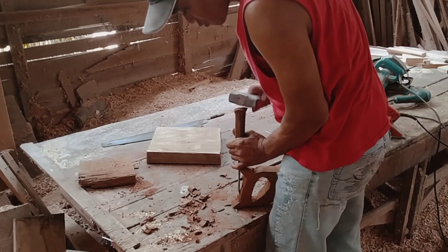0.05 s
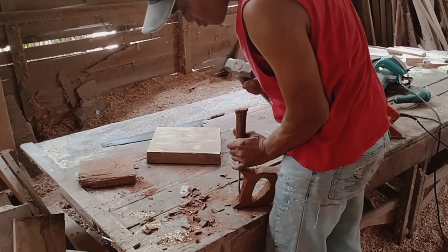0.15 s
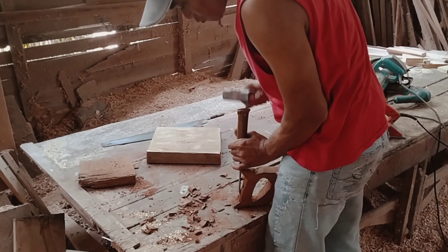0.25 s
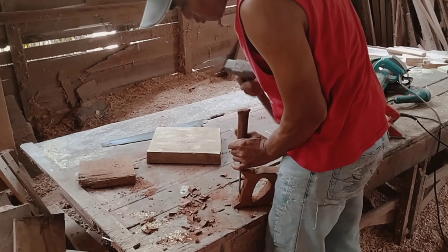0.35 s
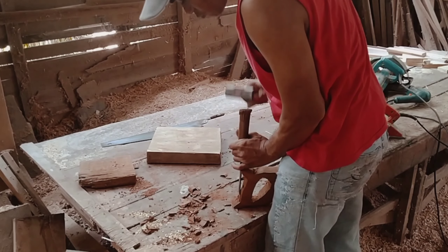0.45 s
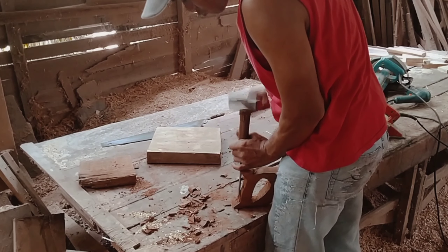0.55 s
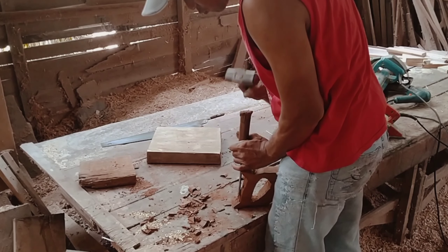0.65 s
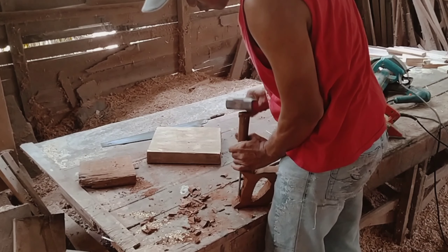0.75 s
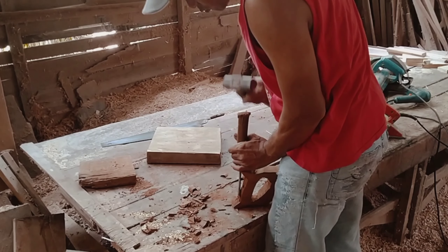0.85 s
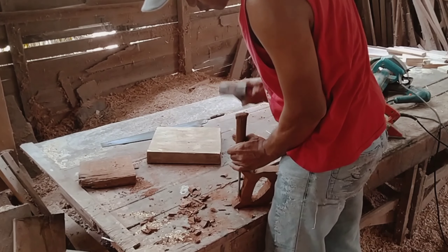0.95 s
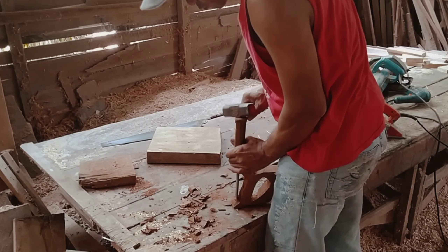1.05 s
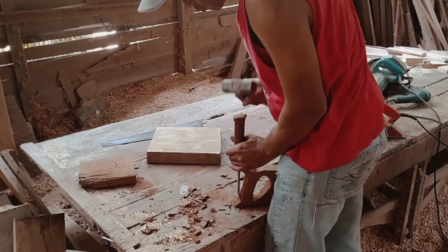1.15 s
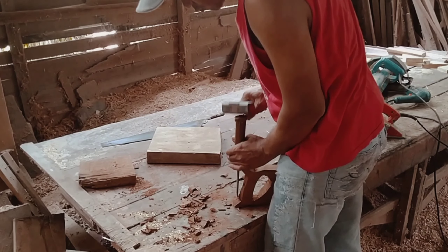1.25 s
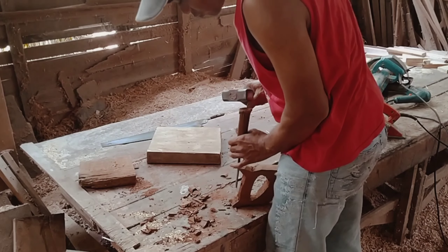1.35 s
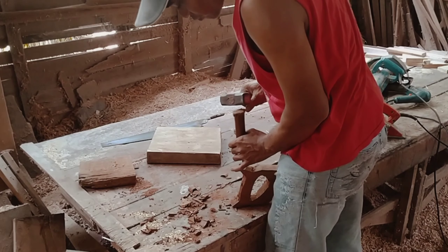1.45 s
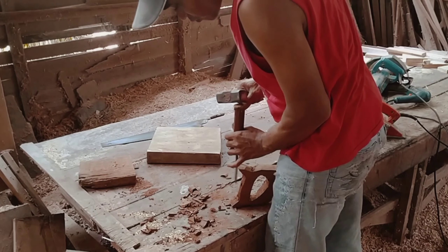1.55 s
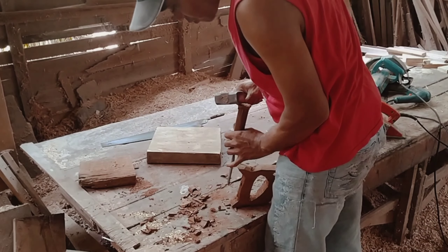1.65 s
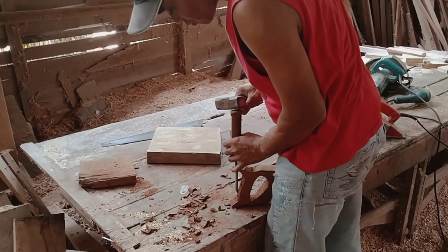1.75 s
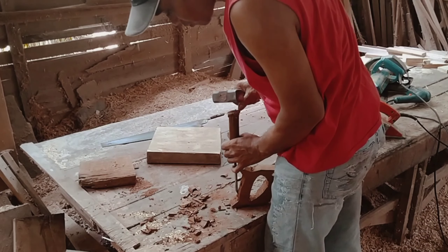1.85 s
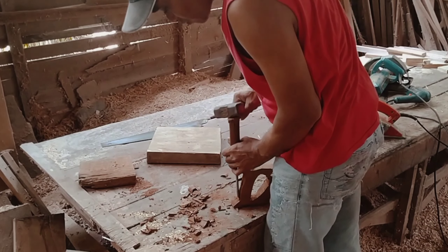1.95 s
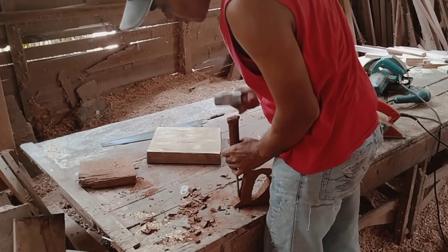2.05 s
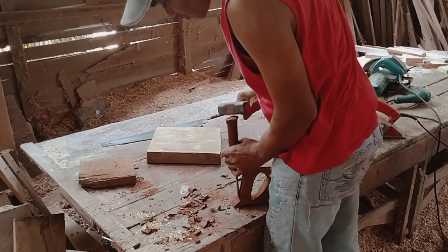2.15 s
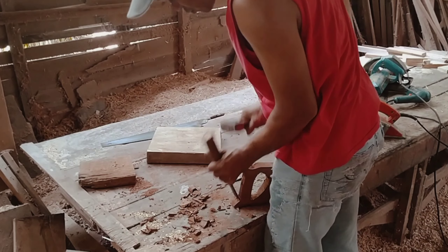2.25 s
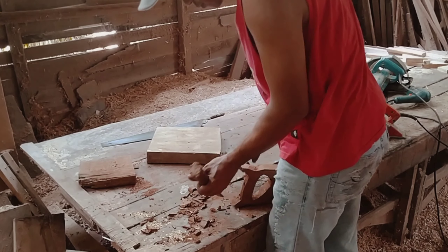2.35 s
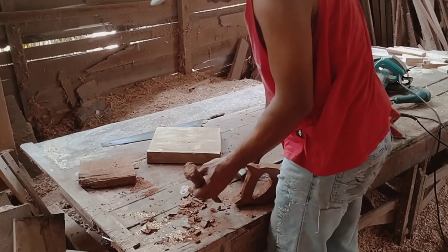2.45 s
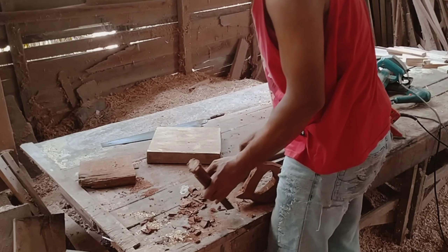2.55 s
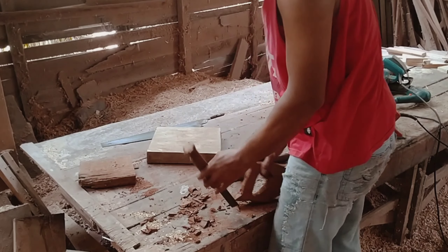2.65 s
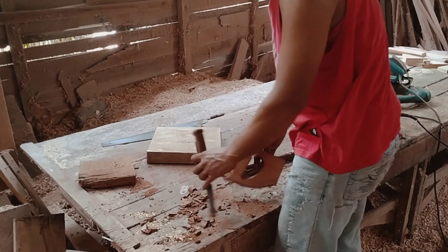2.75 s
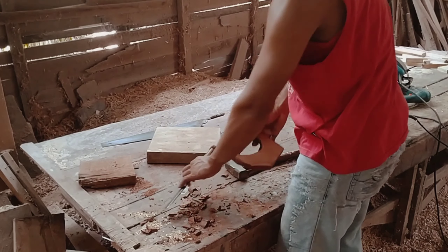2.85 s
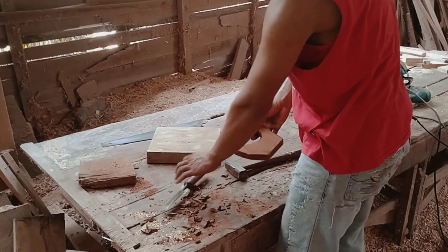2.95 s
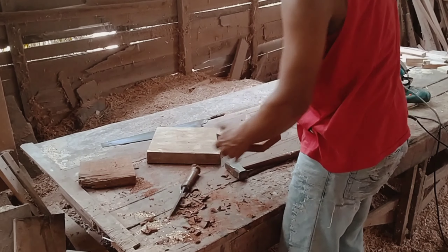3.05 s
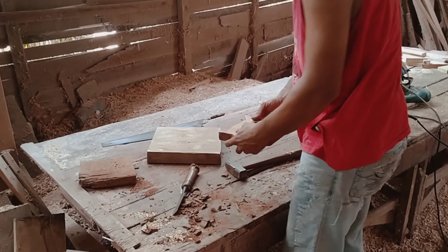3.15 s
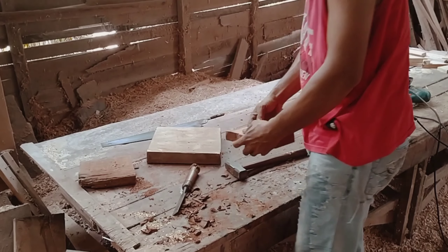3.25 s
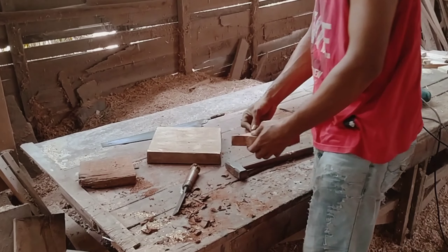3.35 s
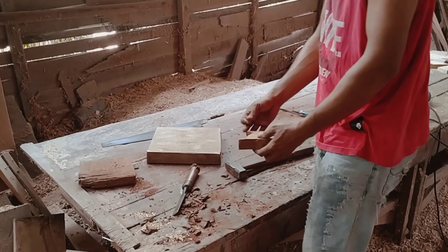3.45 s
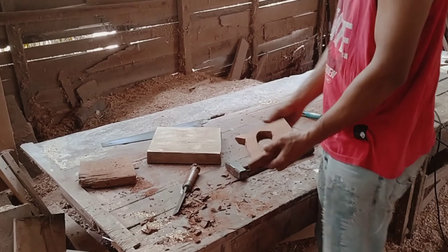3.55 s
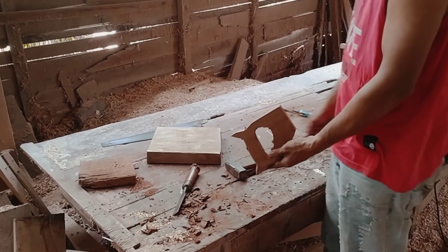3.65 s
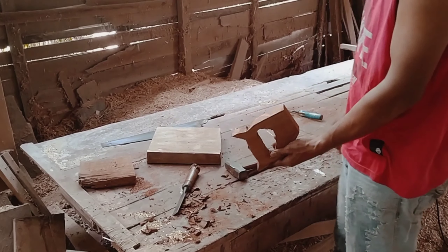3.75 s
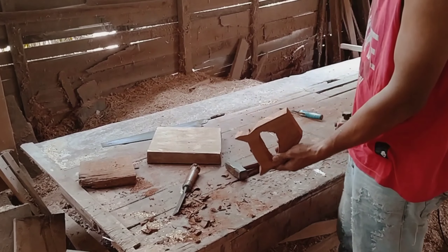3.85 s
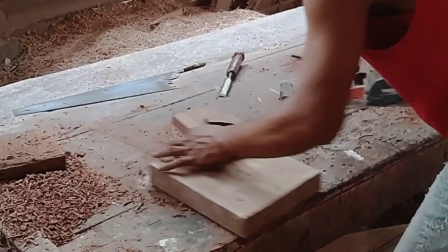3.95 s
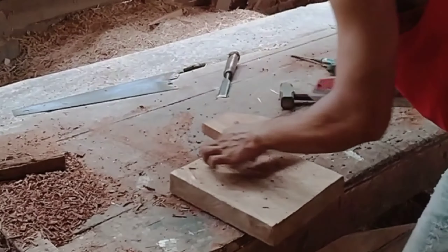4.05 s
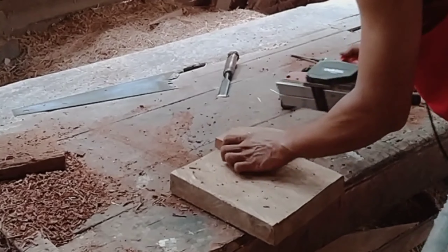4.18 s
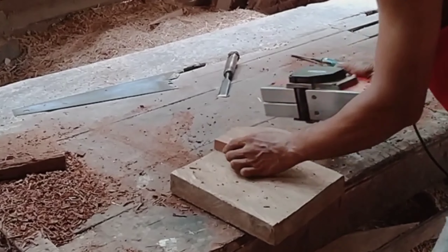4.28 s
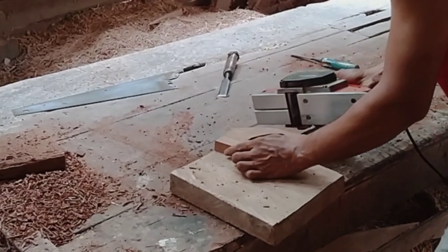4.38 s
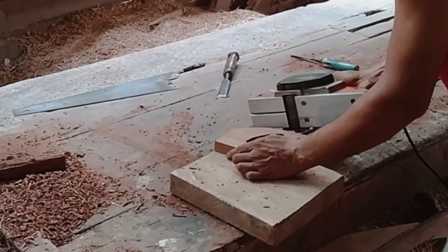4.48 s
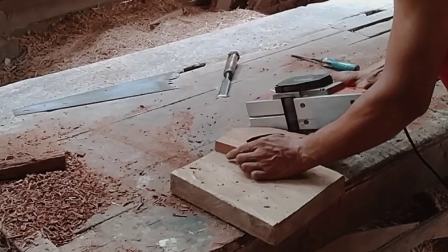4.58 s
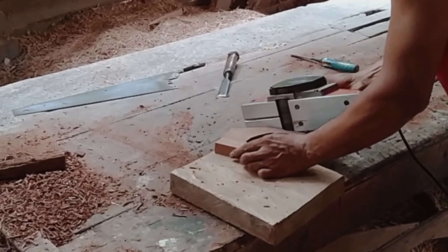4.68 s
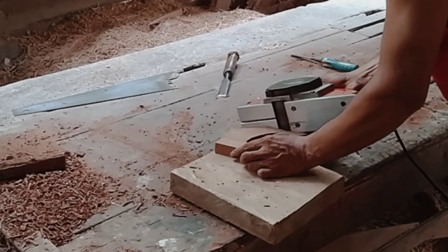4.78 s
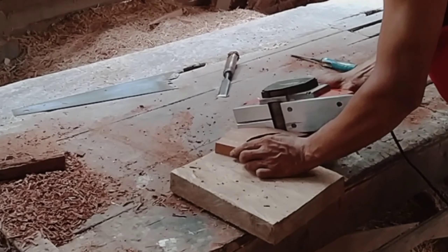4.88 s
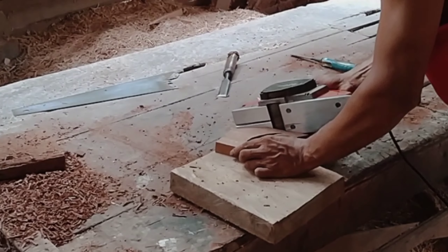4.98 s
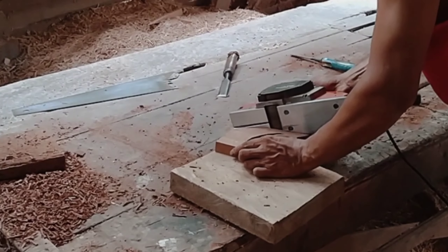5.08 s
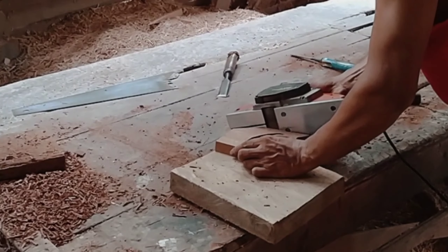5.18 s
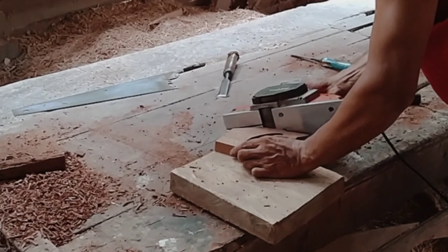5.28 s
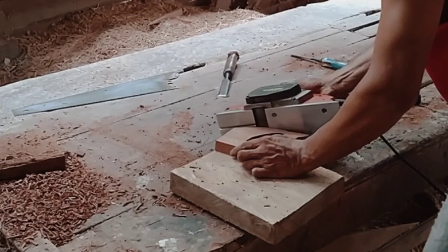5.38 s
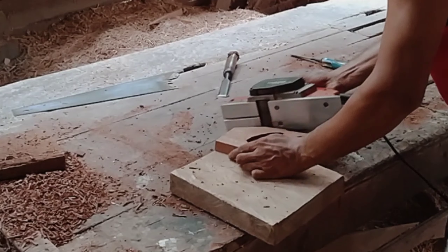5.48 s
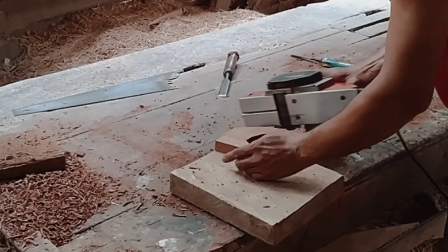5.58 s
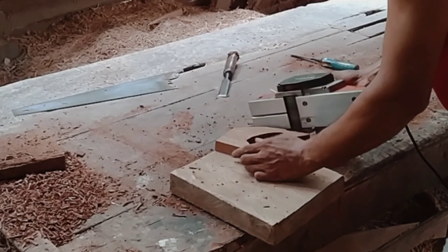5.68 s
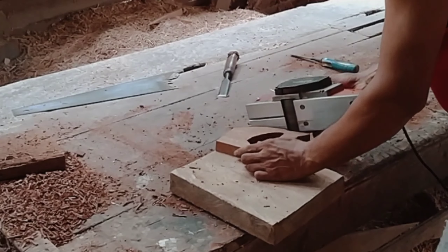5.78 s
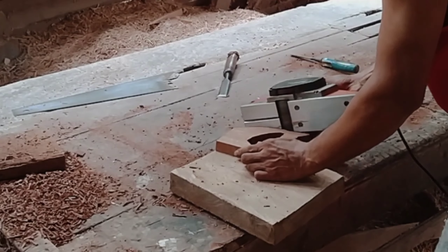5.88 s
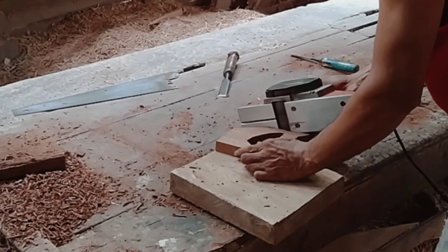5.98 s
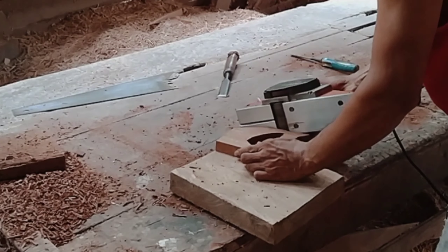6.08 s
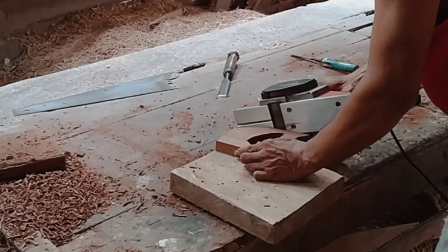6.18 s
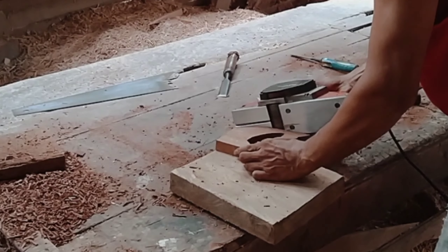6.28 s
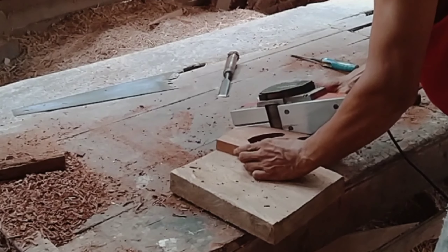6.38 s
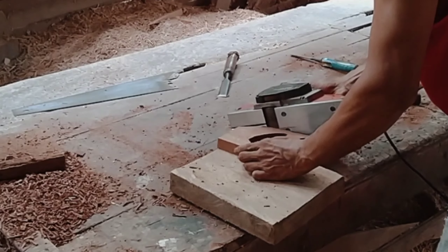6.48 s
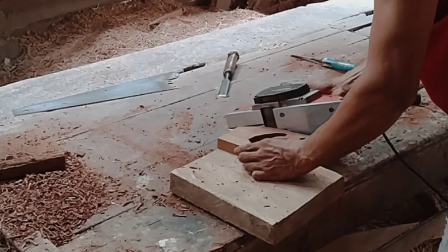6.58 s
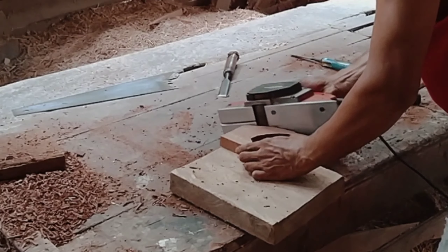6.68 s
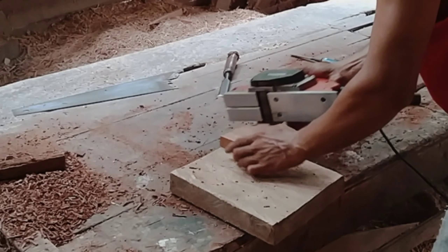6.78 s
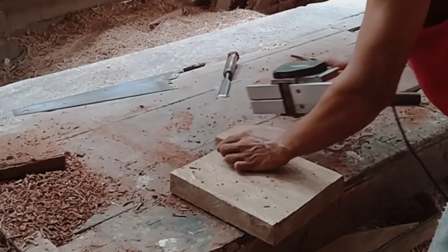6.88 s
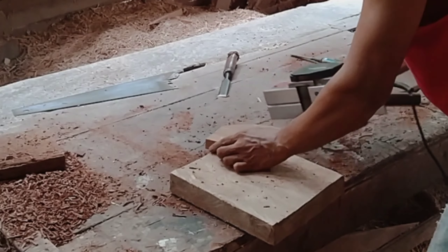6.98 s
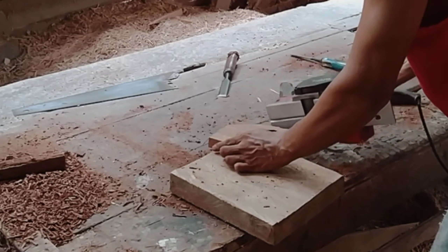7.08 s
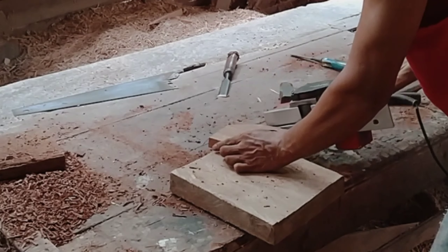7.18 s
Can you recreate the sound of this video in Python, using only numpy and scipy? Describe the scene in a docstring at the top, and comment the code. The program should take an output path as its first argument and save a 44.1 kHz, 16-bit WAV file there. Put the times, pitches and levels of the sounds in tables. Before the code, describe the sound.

Woodworking at a plank bench, one nearby microphone, short shed reflections. Quick hammer-on-chisel cracks with hollow bench resonance come first, a pause, one last strong blow, then scrapes, wooden bumps and two metallic clacks. Faint rustling shavings follow. A hand planer is blipped with a sharp brush squeal, then runs through two tearing passes, its whine sagging under load, turning ragged, and winding down slowly.

```python
"""Chisel and planer in a shed

Plank bench in a wooden shed, one microphone close by, mono; low rumble and a thin insect drone outside.
A hammer drives a chisel: each blow is a crack, a bench ring of decaying modes and noise, and hopping chips.
Tools and wood are put down: shorter cracks, wood or steel rings, gliding scrapes and noise rustles.
An electric hand planer is blipped, makes two cuts that end in chatter and coasts after each: whine, fan
and load lines follow a computed motor speed, with clacks, and noise for rumble, tearing fibres and air."""
import sys
import numpy as np
from scipy import signal
from scipy.fft import rfft, irfft
from scipy.io import wavfile
from scipy.ndimage import uniform_filter1d

SR = 44100
rng = np.random.default_rng(int(sys.argv[2]) if len(sys.argv) > 2 else 0)


def store_wav(level_fs):
    """Save 16-bit WAV to argv[1]."""
    pcm = np.round(np.clip(np.atleast_2d(level_fs), -1, 1) * 32767)
    wavfile.write(sys.argv[1], SR, pcm.T.astype(np.int16))


N = 318703
T = np.arange(N) / SR

# Spectra hold [f/Hz, relative level/dB]. Event levels are relative within each kind unless noted.
# background outdoors: spectrum; mean level/dB
FLOOR_COLOUR = [(25, -12.5), (42, -0.5), (62, -6.5), (105, -3.5), (140, -14), (250, -18.5), (550, -26.5),
                (800, -24.5), (1600, -32), (2300, -35.5), (5500, -52.5), (8300, -48.5), (11000, -54),
                (15000, -51)]
FLOOR_DB = -37.7
# low rumbles at the opening, and under the planer as it starts, cuts and is lifted: [t/s, length/s, level/dB]
LOW_RUMBLES = [(0, .3, -29), (4.08, .58, -28.5), (4.6, .45, -31), (6.25, .42, -27), (6.98, .3, -29)]

# dense reverberant tail of shed and bench: [f/Hz, t60/s]
SHED_DECAY = [(100, 0.23), (260, 0.24), (700, 0.27), (1840, 0.31), (5000, 0.33), (12000, 0.13)]
# clear modes of the bench, then of steel tools: [f/Hz, relative level/dB, t60/s]
BENCH_MODES = [(122.4, -1.5, 0.47), (205, -3, 0.19), (382, -3, .1), (517, 1.5, .09), (672, 3.5, 0.078),
               (756, 3.5, 0.086), (829, -14, 0.099), (918, -1, 0.15), (1000, -3.5, 0.24), (1230, -12, 0.35),
               (1470, -12, 0.19), (1670, -18, 0.063), (1840, -16, 0.35)]
STEEL_MODES = [(1190, -10, 0.33), (1319, -9.5, 0.22), (1410, -9, .3), (1480, 5, 0.24), (1810, 4, .12),
               (3370, -6, 0.16), (3410, -6, 0.19)]
# dense ring of bench and shed, and of the steel: spectra
BENCH_RING_COLOUR = [(41, -45), (70, -6), (107, -2.5), (195, -1), (418, -9.5), (849, -4.5), (985, -12),
                     (1080, -10), (2110, -16.5), (2320, -22), (4800, -33.5), (5170, -33), (6000, -35.5),
                     (7800, -41), (13200, -120)]
STEEL_RING_COLOUR = [(180, -44), (300, -8), (501, -8), (1010, -1), (1360, 3), (1800, -19), (2260, -11.5),
                     (3100, -21), (3420, -16), (4110, -37), (9000, -56), (11700, -90), (19800, -120)]

# wood and tools bumping the bench: [t/s, knock level/dB, brightness/dB per octave, bench ring level/dB]
KNOCKS = [(2.018, -20.5, 5, -19.5), (2.037, -20, -4, -15.5), (2.525, -12, -2.5, -13),
          (2.556, -17, -4.5, -14), (2.572, -11.5, 0, -14), (2.627, -15, 0, -16), (2.988, -19.5, 1.5, -22),
          (3.046, -20.5, -2.5, -18), (3.125, -17.5, 2.5, -18), (3.165, -33, 2, -37),
          (4.199, -23.5, 2.5, -17)]
# steel tools set down: [t/s, clack level/dB, brightness/dB per octave, ring level/dB]
CLACKS = [(2.6487, -8, 1.5, -14), (2.7250, -10.5, -0.5, -13.5), (3.044, -27, 16, -43)]
# light scrapes and squeaks of wood: [t/s, length/s, start f/Hz, end f/Hz, relative pitch wander, level/dB]
SCRAPES = [(0, 0.1, 4000, 3200, 604, -52), (2.33, 0.041, 597, 595, 30, -32.5),
           (2.344, 0.15, 2600, 3260, 400, -47.5), (2.449, 0.099, 1650, 2160, 298, -37.5),
           (2.487, 0.047, 820, 806, 300, -39), (4.105, 0.12, 3170, 3100, 800, -50)]
# faint rustles of shavings under the hands: [t/s, length/s, level/dB]
RUSTLES = [(3.408, 0.063, -54), (3.655, .03, -52), (3.878, 0.062, -57), (4.08, 0.07, -51),
           (4.21, 0.13, -49), (4.33, .02, -48), (4.43, 0.17, -45.5)]
# contact of wood on bench, and of steel: spectra
KNOCK_COLOUR = [(47, -24), (80, -6), (224, 0.5), (669, -4.5), (2440, -18.5), (3310, -34), (4310, -34.5),
                (5850, -50), (6970, -43.5), (9270, -51), (15000, -49)]
CLACK_COLOUR = [(88, -53), (150, -6.5), (850, -9), (1430, 4.5), (1980, -4), (2310, 1.5), (2810, -5),
                (3210, -27), (3820, -20.5), (5200, -37), (15000, -51)]

# hammer on chisel: [t/s, blow level/dB, brightness/dB per octave, bench ring level/dB, chips level/dB]
BLOWS = [(0.1286, 1, -1.5, 3, -30), (0.3218, -1.5, -0.5, -1.5, -32.5), (0.4984, -2, 0, -1, -34.5),
         (0.6639, -2.5, 2, -5, -36.5), (0.8309, -6, 2.5, -5, -39.5), (.9860, -1.5, 2, -3, -43.5),
         (1.1382, -3.5, 2, -3.5, -46), (1.3100, -9.5, 2, -15, -71), (2.1870, 2, -0.5, -0.5, -51)]
# hammer contact: spectrum
BLOW_COLOUR = [(47, -54), (80, -3.5), (325, -7), (684, 2.5), (1540, -10), (1720, -10.5), (2380, -7.5),
               (3030, -21.5), (4400, -28), (5720, -35.5), (6530, -29.5), (7280, -36.5), (8300, -29),
               (10300, -45.5), (15000, -37)]

# clacks of planer casing and trigger, and of the knives chattering and leaving the wood:
# [t/s, clack level/dB, brightness/dB per octave]
PLANER_CLACKS = [(4.221, -27, -3), (4.229, -13, -3), (4.238, -35, -2), (4.515, -26, 4.5), (4.532, -16, 3),
                 (4.560, -16, 8.5), (4.738, -17, 10), (5.422, -23, 5.5), (6.575, -14, 0.5), (6.612, -12, 1),
                 (6.655, -19, 4), (6.712, -20, 10)]
# contact of these clacks: spectrum
PLANER_CLACK_COLOUR = [(200, -12), (500, -7), (800, -2.5), (1200, 1), (1800, 9), (2600, -9.5), (4000, -19),
                       (6000, -27), (15000, -47)]

# brush squeal at switch-on: attack, hold, then it sags in pitch and dies
SWITCH_ON_S, SQUEAL_ATTACK_S, SQUEAL_HOLD_S, SQUEAL_SAG_S, SQUEAL_T60_S = 4.522, .004, .014, .014, .115
SQUEAL_HZ, SQUEAL_END_HZ, SQUEAL_DB = 6550, 5920, -7.5

# planer trigger: [pressed t/s, released t/s]
TRIGGER = [(4.491, 4.571), (4.728, 5.538), (6.002, 6.878)]
# the motor pulls hardest from rest, down to nothing at ZERO_PULL_HZ; friction coasts it down (1/e time)
PULL_HZ_PER_S, ZERO_PULL_HZ, PULL_FADE, COAST_S = 2766, 483.7, 1.119, 2.383
# passes over the wood: [enters t/s, full drag t/s, bites hardest t/s, leaves t/s, full drag/Hz per s,
# drag on leaving/Hz per s, level/dB, uneven knives level/dB, extra whine/dB (air takes half)]
CUTS = [(4.754, 5.107, 5.02, 5.42, 477, 541, -1, 1, 2.5), (5.919, 6.231, 6.39, 6.71, 348, 270, .4, -10, -4)]
# after its hardest bite a cut turns ragged; the knives come free quickly and the whine recovers
RAGGED_S, EXIT_S, RECOVER_S = .3, .02, .1
LAST_BITE = .95  # share of the bite left at the end of a pass
CHATTER_RATIO, CHATTER_DECAY, CHATTER_SHARE = 1 / 3, .3, .7  # bounces per motor turn, bounce periods, depth 0-1
DRUM_RATIO = .5  # knife drum turns per motor turn

# knife buzz, commutator rasp, tearing fibres: relative level/dB, change in a ragged cut/dB
BUZZ_DB, BUZZ_RAGGED_DB = -15.2, -7
RASP_DB, RASP_RAGGED_DB = -21.7, -3
TEAR_DB, TEAR_RAGGED_DB = -16.4, 2.6
# whine at 400 turns/s and cooling air: relative level/dB, change at hardest bite/dB, change when ragged/dB
WHINE_DB, WHINE_BITE_DB, WHINE_RAGGED_DB = -17, 6.5, -13
AIR_DB, AIR_BITE_DB, AIR_RAGGED_DB = -22.7, 6, -7.5
FAN_DB = -13  # blade tone, heard while the motor pulls
# weaker partials of the whine: [multiple of motor speed, level against the whine/dB]
OVERTONES = [(1, -15), (2, -11.5), (6, -16), (7, -22), (8, -30), (9, -27), (10, -27), (11, -25), (12, -36)]
# housing resonances that the three loud partials glide through: spectrum
HOUSING_COLOUR = [(800, -9), (950, -4.5), (1050, -6), (1170, -1), (1250, 0), (1320, -4.5), (1500, -5),
                  (1620, -3), (1760, -3.5), (1930, -8), (2080, -16)]
# fan duct, cooling air, knife buzz, commutator rasp, tearing fibres: spectra
FAN_COLOUR = [(800, -35), (1350, 1), (1950, -3), (2550, -11), (3150, -4), (3650, -15), (4000, -30)]
AIR_COLOUR = [(60, -14), (140, 0), (220, -1.5), (500, -7), (900, -3.5), (1300, 0.5), (2000, -1.5),
              (2900, -4.5), (4200, -6.5), (5500, -16), (7000, -12), (8400, -7), (10500, -14.5),
              (13000, -16.5), (15300, -8)]
BUZZ_COLOUR = [(1500, -29), (2250, 5.5), (2600, -6.5), (3020, -3), (3400, -6), (3700, -12.5), (4100, -3.5),
               (4550, 0.5), (5000, -18)]
RASP_COLOUR = [(4500, -5), (5400, -2), (6200, 1.5), (7400, 1), (8700, 5), (10000, -6.5), (12000, -10),
               (15000, -5)]
TEAR_COLOUR = [(80, -21), (200, -5), (500, -16.5), (900, -3), (1300, -3), (1950, 3), (2700, -7), (3500, -6),
               (4450, 2), (5200, -12.5), (7000, -11), (8500, -6.5), (11000, -21), (15000, -20)]

TOP_HZ = 15650  # upper limit of the recorder


def undb(db):
    """Decibels to gain."""
    return 10 ** (np.asarray(db) / 20)


def unit(x):
    """Scale to rms 1."""
    return x / np.sqrt(np.mean(x ** 2) + 1e-18)


def lookup(hz, table):
    """Read an [f/Hz, value] table on a log frequency axis."""
    f, value = np.transpose(table)
    return np.interp(np.log(hz + 1e-3), np.log(f), value)


def colour(x, table):
    """Filter by an [f/Hz, level/dB] spectrum; rms 1."""
    hz = np.fft.rfftfreq(len(x), 1 / SR)
    return unit(irfft(rfft(x) * undb(lookup(hz, table)), len(x)))


def walk(rate):
    """Smooth random wander with spread 1, from new values drawn at the given rate/Hz."""
    k = max(int(SR / rate), 1)
    steps = np.repeat(rng.standard_normal(N // k + 2), k)[:N]
    return unit(uniform_filter1d(uniform_filter1d(steps, k), k))


def grains(spread_db):
    """Dense noise whose level jumps every 16 samples, like clicks of very uneven size; rms 1."""
    sizes = undb(spread_db * rng.standard_normal(N // 16 + 1))
    return unit(rng.standard_normal(N) * np.repeat(sizes, 16)[:N])


def add(out, s, x):
    """Mix x into out at time s."""
    i = max(int(s * SR), 0)
    out[i:i + len(x)] += x[:N - i]


def fade(t, t60):
    """Exponential decay by 60 dB in t60."""
    return np.exp(-np.log(1000) * t / t60)


def shed(x, wet_db, t60=0.17):
    """Direct sound plus dense reflections from the bench and plank walls."""
    t = T[:SR // 4]
    echoes = rng.standard_normal(len(t)) * fade(t, t60) * (t > .002)
    wet = signal.fftconvolve(x, echoes / np.linalg.norm(echoes))[:N]
    return (x + undb(wet_db) * wet) / np.hypot(1, undb(wet_db))


def contact(table, tilt_db, rattle, rattle_s):
    """A causal crack of the given colour, with a few ms of chatter; energy of rms 1 over 5 ms."""
    size = 4096
    hz = np.fft.rfftfreq(size, 1 / SR)
    level_db = lookup(hz, table) + tilt_db * np.log2(np.maximum(hz, 100) / 1000)
    # folding the cepstrum gives minimum phase: the energy comes at once
    cepstrum = irfft(np.log(undb(level_db)))
    cepstrum[1:size // 2] *= 2
    cepstrum[size // 2 + 1:] = 0
    chatter = unit(rng.standard_normal(size) * np.exp(-T[:size] / rattle_s))
    push = rattle * chatter / np.sqrt(size)
    push[0] += 1
    crack = irfft(np.exp(rfft(cepstrum)) * rfft(push))
    return crack / np.sqrt(np.sum(crack ** 2) / (SR / 200))


def ring(modes, table, tilt_db, modes_db, dense_db, build_s):
    """A struck body: clear modes plus a dense tail that dies band by band; brightness tilts both."""
    t = T[:SR // 2]

    def tilt(hz):
        """Gain of the tilt, level at 1 kHz."""
        return undb(tilt_db * np.log2(hz / 1000))

    clear = 0
    for hz, db, t60 in modes:
        # no two blows land alike, so weights and pitches scatter a little
        size = rng.choice([-1, 1]) * undb(db + 2 * rng.standard_normal()) * tilt(hz)
        struck_hz = hz * (1 + 0.0116 * rng.standard_normal())
        clear = clear + size * fade(t, t60) * np.sin(2 * np.pi * struck_hz * t)
    noise = rfft(colour(rng.standard_normal(len(t)), table))
    octave = np.log2(np.maximum(np.fft.rfftfreq(len(t), 1 / SR), 64))
    dense = 0
    for k in range(6, 15):  # overlapping octave bands centred on 2**k Hz
        band = irfft(noise * np.maximum(1 - abs(octave - k), 0), len(t))
        dense = dense + band * tilt(2 ** k) * fade(t, lookup(2 ** k, SHED_DECAY))
    return undb(modes_db) * clear + undb(dense_db) * dense * (1 - np.exp(-t / build_s))


def surroundings():
    """Low outdoor rumble of shaped noise, and a thin insect drone of one wavering tone that stops at 4.12 s."""
    rumble = colour(rng.standard_normal(N), FLOOR_COLOUR) * undb(2.26 * walk(9)) * undb(FLOOR_DB)
    drone_hz = 1850 + 22 * walk(200)
    drone = np.sin(2 * np.pi * np.cumsum(drone_hz) / SR) * undb(-51.7 + 1.8 * walk(40))
    return rumble + drone * np.clip((4.12 - T) / 0.024, 0, 1)


def low_rumbles():
    """Swells of low shaped noise at the opening and under the planer."""
    swell = np.zeros(N)
    for s, length, db in LOW_RUMBLES:
        add(swell, s, undb(db) * np.sqrt(np.hanning(int(length * SR))))
    rumble = colour(rng.standard_normal(N), [(25, -5), (55, -1.5), (110, -1), (230, -3.5), (400, -16),
                                             (1200, -30), (4000, -44), (12000, -77)])
    return swell * rumble


def handling():
    """Wood bumps and steel clacks crack and ring; scrapes are gliding tones; rustles are shaped noise."""
    out, rustle = np.zeros((2, N))
    for s, db, tilt_db, ring_db in KNOCKS:
        add(out, s, undb(db - 3) * contact(KNOCK_COLOUR, tilt_db, rattle=1.6, rattle_s=0.0067))
        body = ring(BENCH_MODES, KNOCK_COLOUR, 0.53 * tilt_db, modes_db=-20, dense_db=-10.5, build_s=0.0028)
        add(out, s, undb(ring_db) * body)
    for s, db, tilt_db, ring_db in CLACKS:
        add(out, s, undb(db - 4) * contact(CLACK_COLOUR, tilt_db, rattle=0.4, rattle_s=0.0012))
        body = ring(STEEL_MODES, STEEL_RING_COLOUR, .4 * tilt_db, modes_db=-17.5, dense_db=-6.5, build_s=0.0039)
        add(out, s, undb(ring_db) * body)
    for s, length, start_hz, end_hz, wander, db in SCRAPES:
        n = int(length * SR)
        hz = np.linspace(start_hz, end_hz, n) + wander * 0.79 * walk(1500)[:n]
        swell = undb(db + 3.3 * walk(170)[:n]) * np.hanning(n)
        add(out, s, swell * np.sin(2 * np.pi * np.cumsum(hz) / SR))
    for s, length, db in RUSTLES:
        add(rustle, s, undb(db) * np.hanning(int(length * SR)))
    shavings = colour(grains(spread_db=6),
                      [(800, -5), (2500, 9), (5500, -4), (8500, -2), (11000, -7), (15000, -2)])
    return out + rustle * shavings


def hammering():
    """Each blow goes through the chisel into the bench; chips jump and patter back."""
    out, patter = np.zeros((2, N))
    t = T[:SR // 3]
    # most chips land together, a few bounce on
    flight = np.exp(-.5 * ((t - .045) / 0.035) ** 2) + 0.26 * fade(t, 0.63)
    for s, db, tilt_db, ring_db, chips_db in BLOWS:
        add(out, s, undb(db - 7.5) * contact(BLOW_COLOUR, tilt_db, rattle=1.25, rattle_s=0.0034))
        body = ring(BENCH_MODES, BENCH_RING_COLOUR, 0.32 * tilt_db, modes_db=-21, dense_db=-13.5, build_s=0.0024)
        add(out, s, undb(ring_db) * body)
        add(patter, s, undb(chips_db) * flight)
    chips = colour(grains(spread_db=2.5),
                   [(1500, -3), (3000, 1.5), (5500, -9), (7800, 1), (10500, -4), (14500, -2)])
    return out + patter * chips * undb(2.5 * walk(150))


def planer_clacks():
    """Short rattling cracks of casing and trigger, and of the knives on the wood, with shed reflections."""
    out = np.zeros(N)
    for s, db, tilt_db in PLANER_CLACKS:
        add(out, s, undb(db) * contact(PLANER_CLACK_COLOUR, tilt_db, rattle=2.5, rattle_s=.006))
    return shed(out, wet_db=-5.5)


def brushes():
    """The carbon brushes squeal on the commutator as it starts to turn: a rough tone and its octave."""
    t = T - SWITCH_ON_S
    hz = np.interp(t, [SQUEAL_HOLD_S, SQUEAL_HOLD_S + SQUEAL_SAG_S], [SQUEAL_HZ, SQUEAL_END_HZ])
    envelope = np.clip(t / SQUEAL_ATTACK_S, 0, 1) * fade(np.maximum(t - SQUEAL_HOLD_S, 0), SQUEAL_T60_S)
    phase = 2 * np.pi * np.cumsum(hz * (1 + 0.0234 * walk(900))) / SR
    squeal = undb(SQUEAL_DB + 2 * walk(300)) * (np.sin(phase) + undb(-12) * np.sin(2 * phase))
    return shed(squeal * envelope, wet_db=-5.5)


def cutting(powered):
    """Each pass drags on the motor, bites ever harder, then turns ragged until the knives come free."""
    drag, bite, ragged, strength, uneven, extra_db = np.zeros((6, N))
    for enters, full, hardest, leaves, full_drag, last_drag, db, uneven_db, whine_db in CUTS:
        free = leaves + EXIT_S
        drag += np.interp(T, [enters, full, leaves, free], [0, full_drag, last_drag, 0])
        depth = np.interp(T, [enters, hardest, leaves, free], [0, 1, LAST_BITE, 0]) * powered
        recovery = np.clip(1 - (T - leaves) / RECOVER_S, 0, 1)
        rough = np.clip((T - hardest) / RAGGED_S, 0, 1) ** 2 * recovery
        bite += depth
        ragged += rough
        strength += undb(db) * depth
        uneven += undb(uneven_db) * rough
        extra_db += whine_db * depth
    return drag, bite, ragged, strength, uneven, extra_db


def motor_speed(powered, drag):
    """Turns per second: the pull of the motor against friction and the drag of the knives."""
    step = 32  # samples per update
    hz, speeds = 0., []
    for on, wood in zip(powered[::step].tolist(), drag[::step].tolist()):
        pull = on * PULL_HZ_PER_S * max(1 - hz / ZERO_PULL_HZ, 0) ** PULL_FADE
        hz += (pull - hz / COAST_S - wood) * step / SR
        speeds.append(max(hz, 0))
    return np.interp(T, T[::step], speeds)


def planer():
    """Motor and fan whine on one shaft; under load the belt-driven knives buzz and tear, the commutator rasps."""
    powered = sum(1. * (T > pressed) * (T < released) for pressed, released in TRIGGER)
    powered = uniform_filter1d(powered, size=600)
    drag, bite, ragged, strength, uneven, extra_db = cutting(powered)
    hz = motor_speed(powered, drag) * (1 + 0.0014 * walk(60))
    turn = 2 * np.pi * np.cumsum(hz) / SR
    drum = DRUM_RATIO * turn
    # the load shakes the shaft, which blurs the high multiples
    shaken = turn + (0.03 + 0.012 * bite + 0.04 * ragged) * walk(200)

    def partial(phase, flutter_db):
        """A line of rms near 1 that flutters as the tool moves."""
        return np.sqrt(2) * np.sin(phase + rng.uniform(0, 2 * np.pi)) * undb(flutter_db * walk(26))

    def stack(table, order, count, flutter_db, offset=0):
        """Multiples of the shaft speed from the given order up, coloured by the given spectrum; rms 1 while
        cutting."""
        lines = sum(undb(lookup(k * hz, table)) * partial(k * shaken + offset, flutter_db)
                    for k in range(order, order + count))
        return lines / np.sqrt(np.average(lines ** 2, weights=bite))

    whine_db = WHINE_DB + WHINE_BITE_DB * bite ** 2 + WHINE_RAGGED_DB * ragged + extra_db
    whine = sum(undb(whine_db + lookup(k * hz, HOUSING_COLOUR)) * partial(k * shaken, flutter_db=2.4)
                for k in (3, 4, 5))
    # gliding lines beat against their own reflections
    whine = shed(whine, wet_db=-12)
    overtones = sum(undb(db) * partial(round(k) * shaken, flutter_db=3) for k, db in OVERTONES)
    whine += undb(whine_db) * overtones
    whine *= (hz / 400) ** 2.2 * undb(1.6 * walk(140))  # it grows steeply with speed and trembles

    fan = undb(FAN_DB + lookup(11 * hz, FAN_COLOUR)) * partial(11 * turn + .6 * walk(500), flutter_db=2)
    fan *= powered * undb(3.2 * walk(130))  # the blade tone stutters

    knives = stack(BUZZ_COLOUR, order=6, count=8, flutter_db=3.8)
    commutator = stack(RASP_COLOUR, order=14, count=27, flutter_db=3.5)
    # when one knife bites deeper, the drum puts lines between the multiples of the motor
    between = stack(TEAR_COLOUR, order=2, count=7, flutter_db=4.5, offset=drum)
    # two knives bite on each turn of the drum
    fibres = grains(spread_db=4) * (1 + 0.69 * np.cos(2 * drum))
    tearing = colour(fibres, TEAR_COLOUR) * undb((1 + 1.3 * ragged) * walk(90))

    air = colour(rng.standard_normal(N) * (1 + 0.29 * np.cos(turn)), AIR_COLOUR) * undb(0.92 * walk(25))
    air_db = AIR_DB + AIR_BITE_DB * bite + AIR_RAGGED_DB * ragged + extra_db / 2
    air *= undb(air_db) * (T > SWITCH_ON_S)

    buzz = undb(BUZZ_DB + BUZZ_RAGGED_DB * ragged) * knives
    rasp = undb(RASP_DB + RASP_RAGGED_DB * ragged) * commutator
    tear = undb(TEAR_DB + TEAR_RAGGED_DB * ragged) * (tearing + uneven * between) / np.hypot(1, uneven)
    load = strength * (buzz + rasp + tear)
    # in a ragged cut the sole bounces on the wood, so the knives bite in bursts
    bounce_phase = CHATTER_RATIO * turn / (2 * np.pi) % 1
    bounces = unit(np.exp(-bounce_phase / CHATTER_DECAY))
    load *= 1 + np.clip(CHATTER_SHARE * ragged, 0, 1) * (bounces - 1)
    return whine + shed(fan, wet_db=-5.5) + shed(load, wet_db=-12) + air


def scene():
    """Everything reaches one microphone, written alike to two channels."""
    background = surroundings() + low_rumbles()
    bench_work = handling() + hammering()
    planing = planer_clacks() + brushes() + planer()
    return np.tile(background + bench_work + planing, (2, 1))


def record(dry):
    """The recorder rounds peaks near full scale and cuts the top."""
    rounded = dry / (1 + dry ** 6) ** (1 / 6)
    return signal.sosfilt(signal.ellip(10, .2, 70, TOP_HZ, fs=SR, output="sos"), rounded)


dry = scene()
out = record(dry)
store_wav(out)
```